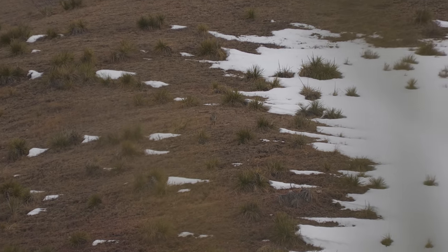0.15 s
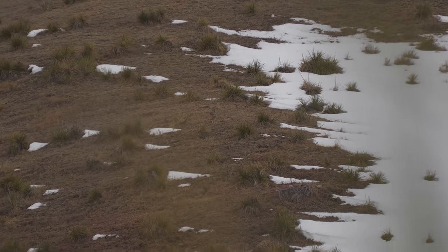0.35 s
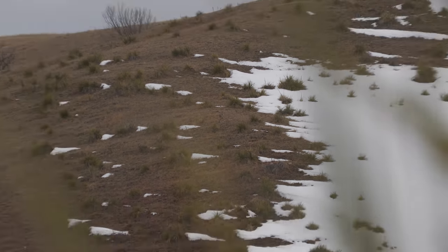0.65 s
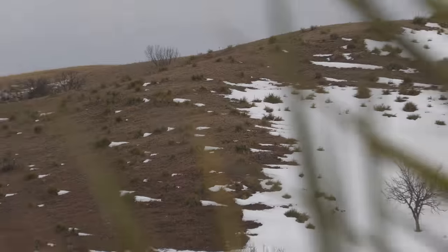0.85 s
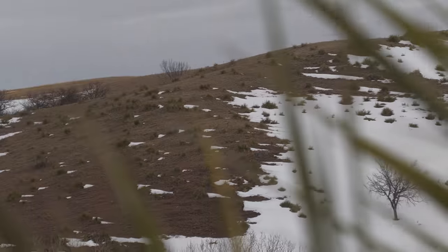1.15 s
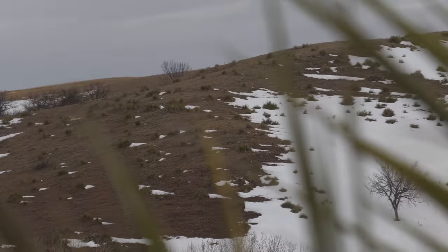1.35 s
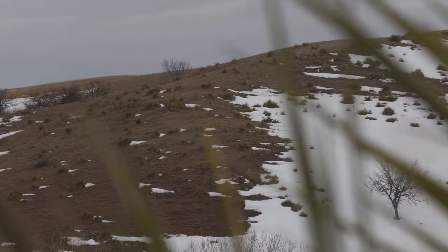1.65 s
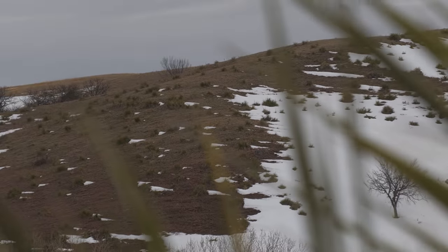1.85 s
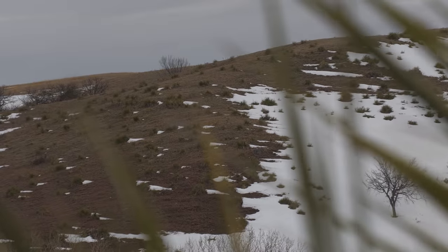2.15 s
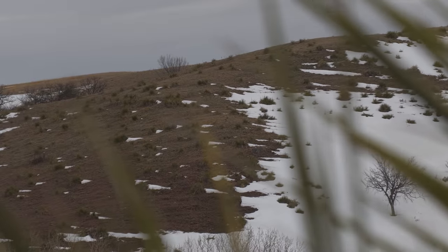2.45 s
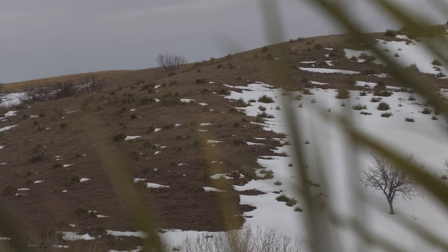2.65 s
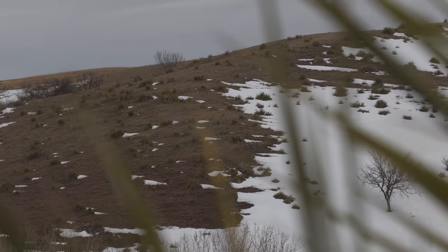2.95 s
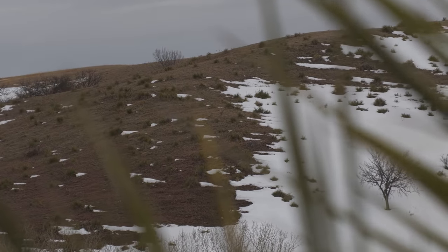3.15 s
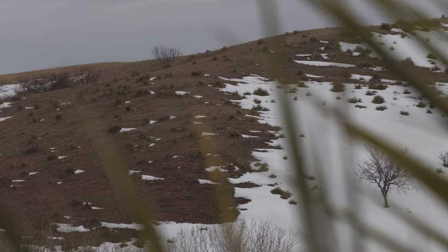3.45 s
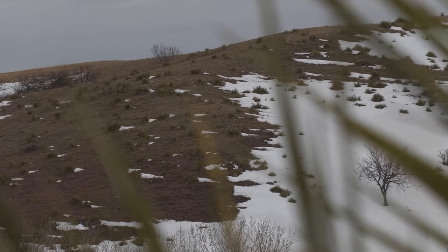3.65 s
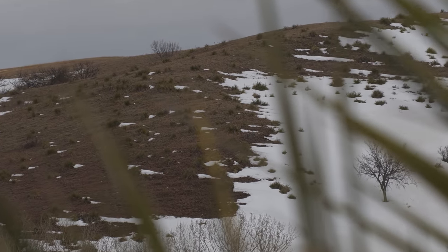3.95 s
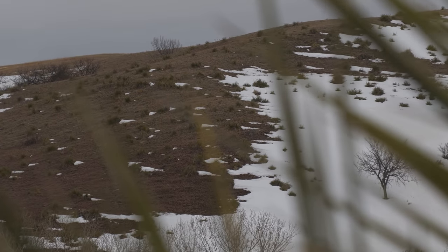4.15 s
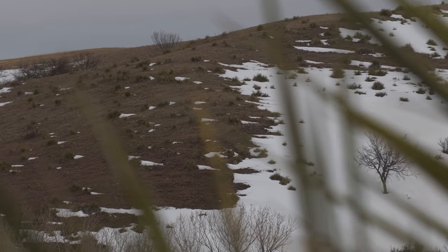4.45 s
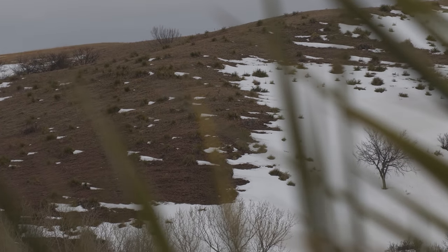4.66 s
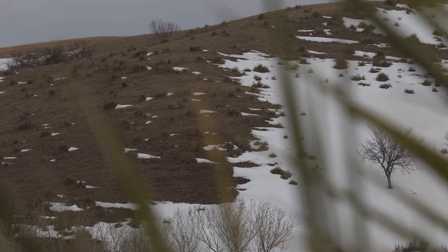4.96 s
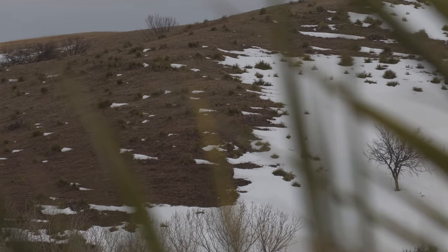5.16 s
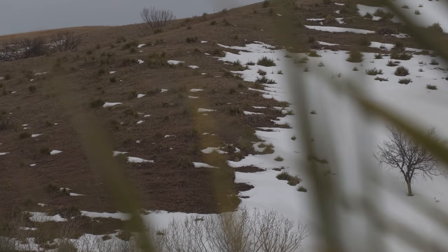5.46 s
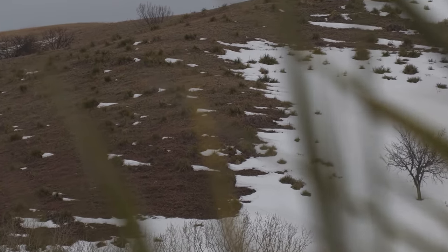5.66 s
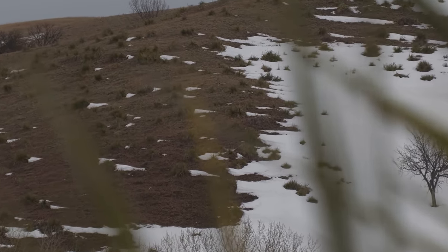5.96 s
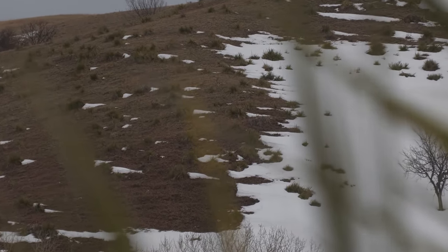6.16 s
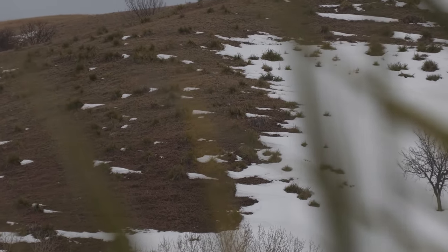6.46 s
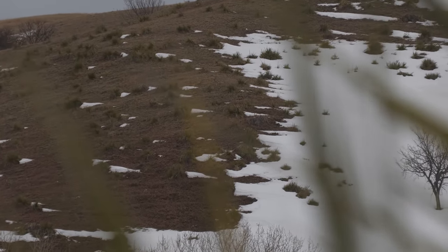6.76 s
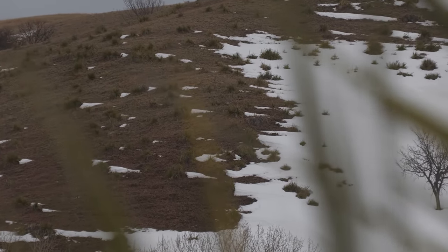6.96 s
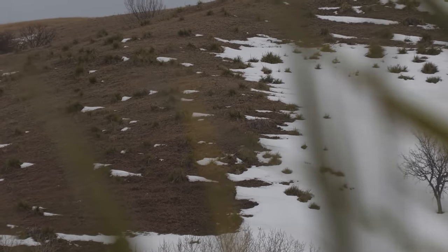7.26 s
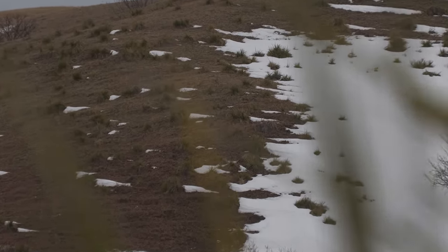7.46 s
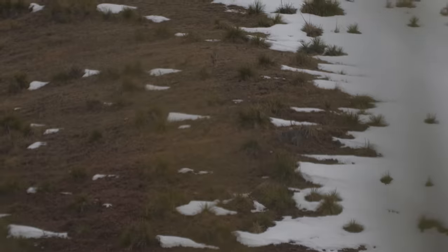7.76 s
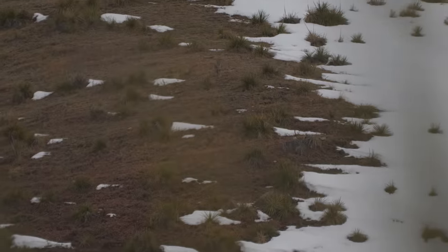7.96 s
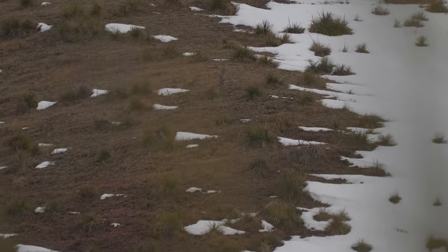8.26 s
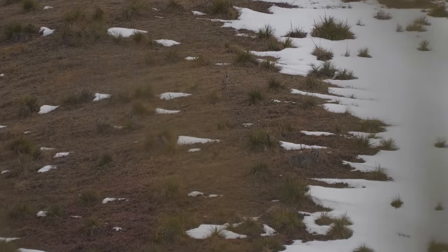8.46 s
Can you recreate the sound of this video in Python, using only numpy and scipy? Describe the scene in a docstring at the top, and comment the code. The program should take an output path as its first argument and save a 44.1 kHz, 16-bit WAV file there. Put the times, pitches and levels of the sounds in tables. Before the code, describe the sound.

A single coyote barks repeatedly on an open hillside. Each bark is very brief: a hoarse rasp jumping to a high squeal, then sliding down fast. The slopes return a diffuse echo fading over about a second. Low wind buffets the camera microphone throughout, with a few small handling ticks and soft hiss. After a pause, stronger gusts and a throaty huff precede the last bark.

```python
"""Coyote barking on an open hillside

Each bark starts as a hoarse rasp (uneven pulses and breath), locks into a high squeal (a gliding tone with
overtones) and slides down through the throat's resonances. A throaty huff comes before the last bark.
The slopes answer each bark with scattered copies for about a second. Wind, made of shaped noise and short
low swings, rumbles on the camera microphone. The camera ticks now and then, and its preamplifier hisses.
"""
import sys
import numpy as np
from scipy import signal
from scipy.fft import rfft, irfft, next_fast_len
from scipy.io import wavfile
from scipy.ndimage import uniform_filter1d, map_coordinates

SR = 44100
rng = np.random.default_rng(int(sys.argv[2]) if len(sys.argv) > 2 else 0)


def bounce(signal):
    """Save signal as a 16-bit WAV file at the path given by the first command-line argument."""
    frames = np.transpose(np.atleast_2d(signal))
    limited = np.clip(frames, -1, 1)
    pcm = np.round(limited * 32767).astype(np.int16)
    wavfile.write(sys.argv[1], SR, pcm)


N = 379701
LEAD = SR  # samples played before the start, so the first bark is only heard through its answer

# Noise tables give the colour only (level/dB per Hz, relative); the loudness is set where they are used.
# Wind strength over time, before short gusts: [t/s, buffet level/dB, roar level/dB]
WIND_STRENGTH = [(0, -28, -43), (.1, -31, -48), (.3, -37, -47), (.55, -32, -47), (1.25, -32, -47),
                 (1.4, -37, -50), (1.62, -34, -48), (2.1, -36, -48), (2.57, -42, -51), (2.85, -36, -49),
                 (3.25, -40, -50), (3.5, -32, -48), (3.85, -35, -48), (4.3, -40, -49), (4.8, -36.5, -48),
                 (5.42, -44, -49), (5.7, -39, -47), (5.9, -44, -48), (6.1, -37, -49), (6.2, -44, -51),
                 (6.5, -36, -50), (7.2, -38, -47), (7.35, -31, -45), (7.75, -28, -39), (7.85, -32, -44),
                 (8.02, -27, -37), (8.3, -31, -44), (8.61, -32, -45)]
# Colour of the low buffeting: [f/Hz, level/dB per Hz]
BUFFET_COLOUR = [(5, -23), (20, -6), (60, 2), (110, -1), (160, -8), (250, -23.5), (400, -68.5), (700, -120)]
# Colour of the roar above it: [f/Hz, level/dB per Hz]
ROAR_COLOUR = [(100, -16.5), (200, -1), (320, -8.5), (450, -13.5), (900, -27.5), (1300, -43.5),
               (2000, -46.5), (3500, -63), (5000, -120)]
# Colour of the hiss shared by both channels: [f/Hz, level/dB per Hz]
SHARED_HISS_COLOUR = [(300, 7.5), (1200, 7.5), (2200, 4.5), (3000, 2.5), (5380, 0), (5840, -0.5)]
# Colour of the hiss that is opposite in the two channels: [f/Hz, level/dB per Hz]
SIDE_HISS_COLOUR = [(1500, -37), (3000, -9), (5000, -3.5), (15000, -1.5)]
# Clear copies from near banks, before the answer's colour: [delay t/s, level/dB]
BANK_ECHOES = [(0.022, -23.5), (.18, -33.5)]
# How the scattered answer swells and dies: [delay t/s, relative level/dB]
SLOPE_ANSWER = [(.01, 16.5), (.05, -1), (.2, -4.5), (.38, -10.5), (.45, -17), (.9, -29), (1.3, -34)]
# Colour of everything the hillside returns: [f/Hz, gain level/dB]
ANSWER_COLOUR = [(300, -24), (700, -1.5), (1000, -3), (1350, 4.5), (1650, 7.5), (2000, 7.5), (2700, 6),
                 (4000, -4)]
# Knocks on the camera body: [t/s, level/dB before the soft onset, ring f/Hz, click level/dB before a shared trim]
CAMERA_TICKS = [(0.524, -39, 597, -39), (1.057, -33, 557, -15), (7.489, -49, 417, 0),
                (7.556, -38, 405, -22), (8.348, -36.5, 638, -12.5)]
# Colour of a tick's click: [f/Hz, level/dB per Hz]
CLICK_COLOUR = [(700, -10), (1500, -3), (3000, -4), (4000, -30)]
# Single strong eddies on the microphone: [centre t/s, highest swing level/dB, swing f/Hz]
EDDY_THUMPS = [(.537, -19, 91), (.795, -29, 108), (1.064, -19, 83), (1.172, -20, 68.6), (3.492, -31, 69.3),
               (7.271, -18.5, 84), (7.5, -21, 60.4), (7.67, -13, 75.4), (7.738, -19, 80),
               (8.004, -19, 70.6), (8.097, -27, 70), (8.206, -22, 70)]
# One row per bark, the first ending just before the start:
# [rasp starts t/s, squeal locks t/s, voice breaks t/s, lands t/s, slide ends t/s, top pitch f/Hz,
#  rasp level/dB, rasp held back at first level/dB,
#  squeal level/dB on entry, on locking, at the top, on landing, at the slide's end,
#  octave in the slide level/dB, low second tone level/dB,
#  extra towards the slopes level/dB: held squeal, slide]
BARK_LIST = [ (-.29, -.224, -.178, -.17, -.146, 2050, -24, 0, -28, -30, -20, -20, -31, -28, -44, .5, .5),
             (.56, .626, .672, .68, .704, 2040, -24, 0, -28, -28, -23, -20, -31, -30, -43, 3, 2),
             (1.29, 1.371, 1.405, 1.413, 1.443, 2055, -26, 0, -38, -24, -25.5, -19.5, -30, -35, -33, 4, 1),
             (1.748, 1.821, 1.845, 1.851, 1.874, 1924, -27, -2, -22, -24, -23, -22, -29.5, -31, -38, 3, 2),
             (2.972, 3.044, 3.078, 3.086, 3.112, 1990, -23, 2, -35, -24, -21, -19.5, -31, -30, -37, 1, 1),
             (3.752, 3.831, 3.858, 3.868, 3.889, 2010, -22, 4, -45, -25, -30, -17, -37, -31, -37, 4, -1),
             (4.452, 4.526, 4.545, 4.556, 4.582, 2010, -24, 6, -30, -32, -39, -19, -38, -35, -33, 11, -3),
             (4.922, 5.001, 5.028, 5.037, 5.06, 1952, -27, 3, -26, -20, -15, -15, -35, -21, -36, -6, -4),
             (5.756, 5.836, 5.868, 5.878, 5.904, 1965, -25, 0, -23, -24, -23, -15, -30.5, -26, -40, 0, -3),
             (7.945, 8.01, 8.043, 8.049, 8.072, 1925, -24, -2, -24, -20, -17, -13.5, -28, -27, -47, -5, 2),
             ]
# The rasp on its way to the lock:
# [share of that time, strongest partial f/Hz, level/dB against its peak, share of the holding back, roughness 0-1]
RASP_PATH = [(0, 940, -21, .3, .9), (.25, 1020, -10, 1, .9), (.5, 1100, -2, .8, .8), (.75, 1180, 0, 0, .75),
             (1, 1240, -7, 0, .45)]
# The rasp at the break: [strongest partial f/Hz, level/dB against its peak, roughness 0-1]
RASP_AT_BREAK = (1260, -21, .2)
# Partials of the rasp: [multiple of the pulse rate, relative level/dB]
PULSE_PARTIALS = [(1, -11), (2, 0), (3, -7), (4, -11), (5, -19), (6, -27)]
# Colour of the breath in the rasp: [f/Hz, level/dB per Hz]
BREATH_COLOUR = [(300, -34), (600, -11.5), (1000, 1.5), (1500, -4), (1800, -30), (2300, -51.5)]
# Colour of the upper breath of a hard push: [f/Hz, level/dB per Hz]
SNARL_COLOUR = [(1200, -37.5), (1700, 9.5), (2050, 4), (2350, -11), (2700, -17), (3200, -32), (4500, -58)]
# How the mouth shapes the rasp: [f/Hz, gain level/dB]
MOUTH_SHAPE = [(250, -8), (500, -1.5), (800, -5.5), (1150, 0), (1600, -0.5), (2050, -8.5), (2350, -13),
               (2700, -10.5), (3300, -14), (4500, -43)]
# Low second tone in the held squeal: [change of level/dB at entry, at the lock, at the top, at the break]
LOW_TONE_PATH = (-4, 0, -3, -16)
# Peaks and valleys of the throat: [f/Hz, gain level/dB]
THROAT_SHAPE = [(500, -6), (770, 0), (1000, -10), (1340, 0), (1640, -13), (1950, 0), (2300, -20), (2680, 0),
                (3150, -18), (3900, -12), (5000, -40)]
# Soft throaty huff before the last bark: [t/s, level/dB]
HUFF_PATH = [(7.67, -47), (7.685, -46), (7.705, -42), (7.74, -45), (7.762, -50)]
# Colour of the huff's breath: [f/Hz, level/dB per Hz]
HUFF_COLOUR = [(600, -43), (850, -3), (1050, 5.5), (1300, -7), (1600, -7), (1900, -47)]

GUST_DB, GUST_RATE = 2.5, 9  # short gusts: depth in dB, random points a second
# Squeal timing: enters this many s before the lock; share of the hold; s to rest after landing; s to die
ENTRY_S, TOP_AT, PAUSE_S, FADE_S = .018, .58, .014, .01
ENTRY_PITCH, LOCK_PITCH, BREAK_PITCH = .83, .98, .965  # shares of the top pitch
LAND_HZ, REST_HZ, END_HZ, LAST_HZ = 1450, 1285, 790, 740  # pitches after the break
BREAK_DB, REST_DB, FADE_DB = -1, -3, -11  # against the top, the landing, the slide's end
VALLEY_DIP_DB = -5  # the level dips halfway through the break, in the throat's deep valley near 1640 Hz
# Octave: against the held squeal; then on landing and when dying, against the octave in the slide
HELD_OCTAVE_DB, LANDING_OCTAVE_DB, OCTAVE_FADE_DB = -30, -17, -3
LOW_GONE_DB = -62  # low tone after the break
LOW_BASE_HZ, LOW_FOLLOWS = 400, .153  # the low tone adds this share of the squeal's pitch to its base
TOP_HZ, OFFSET = 15720, .01524  # the camera's band limit in Hz; its constant offset (full scale is 1)


def amp(db):
    """Turn decibels into a plain factor."""
    return 10 ** (np.asarray(db) / 20)


def unit(x):
    """Scale a sound to an rms of 1."""
    return x / np.sqrt(np.mean(x ** 2) + 1e-20)


def along(points, hz):
    """Read a value between (Hz, value) points, spaced as the ear hears pitch (log axis)."""
    f, v = np.transpose(points)
    return np.interp(np.log(hz + 1), np.log(f + 1), v)


def wobble(n, rate):
    """A smooth random curve through `rate` random points a second."""
    points = rng.standard_normal(int(n * rate / SR) + 4)
    return map_coordinates(points, [np.arange(n) * rate / SR])


def filtered(x, response):
    """Multiply each frequency of a sound by a response."""
    n = x.shape[-1]
    m = next_fast_len(n + 8192)
    hz = np.fft.rfftfreq(m, 1 / SR)
    return irfft(rfft(x, m) * response(hz), m)[..., :n]


def noise(n, colour):
    """Random noise with a given colour and an rms of 1."""
    return unit(filtered(rng.standard_normal(n), lambda hz: amp(along(colour, hz))))


def stretch(rows, fade):
    """Draw smooth curves through timed rows, with a fade in s added at each end: start, fade gain, curves."""
    s, *columns = np.transpose(rows)
    t = np.arange(s[0] - fade, s[-1] + fade, 1 / SR)
    edge = np.clip(np.minimum(t - t[0], t[-1] - t) / fade, 0, 1) ** 2
    curves = [uniform_filter1d(np.interp(t, s, c), size=110) for c in columns]
    return t[0], edge, curves


def turn(hz):
    """Phase of a tone whose pitch moves, from a random starting point."""
    return 2 * np.pi * (np.cumsum(hz) / SR + rng.random())


def wind():
    """Lumpy eddies buffet the microphone; stronger gusts add a roar above them."""
    s, buffet_db, roar_db = np.transpose(WIND_STRENGTH)
    t = np.arange(N) / SR
    lumps = wobble(N, 24)
    gusts = GUST_DB * wobble(N, GUST_RATE)
    buffet = unit(amp(1.15 * lumps) * noise(N, BUFFET_COLOUR))
    roar = unit(amp(0.83 * lumps + 1.28 * wobble(N, 60)) * noise(N, ROAR_COLOUR))
    buffet_gain = amp(np.interp(t, s, buffet_db) + gusts)
    roar_gain = amp(np.interp(t, s, roar_db) + .3 * gusts)
    return buffet_gain * buffet + roar_gain * roar


def hiss():
    """Preamplifier noise and far air, partly shared by the two channels."""
    mid = amp(-59.0) * noise(N, SHARED_HISS_COLOUR)
    side = amp(-66.5) * noise(N, SIDE_HISS_COLOUR)
    return np.array([mid + side, mid - side])


def hillside(voice):
    """Two banks return clear copies; the slopes scatter the voice along paths that flutter in the gusty air."""
    t = np.arange(round(1.3 * SR)) / SR
    delay, db = np.transpose(SLOPE_ANSWER)
    returned = np.zeros(len(voice))
    for _ in range(5):
        level_db = np.interp(t, delay, db, left=-80) + 0.67 * wobble(len(t), 26.46)
        scatter = rng.standard_normal(len(t)) * amp(level_db)
        path = signal.fftconvolve(voice, scatter / np.linalg.norm(scatter))[:len(voice)]
        flutter = 0.78 + 0.3 * wobble(len(voice), 70)
        returned += amp(-20.5) * path * flutter
    for s, echo_db in BANK_ECHOES:
        late = round(s * SR)
        returned[late:] += amp(echo_db) * voice[:-late]
    return filtered(returned, lambda hz: amp(along(ANSWER_COLOUR, hz)))


def ticks():
    """Small knocks on the camera body: two dying tones ring under a short click of noise."""
    out = np.zeros(N + SR)
    t = np.arange(SR // 10) / SR
    for s, db, hz, click_db in CAMERA_TICKS:
        tones = np.sin(2 * np.pi * hz * t) + 0.23 * np.sin(2 * np.pi * 1.59 * hz * t)
        ring = amp(-60 * t / .05) * tones  # falls 60 dB in 50 ms
        click = amp(click_db + 0.5 - 60 * t / 0.024) * noise(len(t), CLICK_COLOUR)
        onset = 1 - np.exp(-t / .001)
        out[round(s * SR):][:len(t)] += amp(db) * (ring + click) * onset
    return out[:N]


def thumps():
    """Each eddy pushes the microphone's diaphragm through about one and a half swings."""
    out = np.zeros(N + SR)
    t = np.arange(-SR // 20, SR // 20) / SR
    for (s, db, hz), chance in zip(EDDY_THUMPS, rng.random(len(EDDY_THUMPS))):
        swing = np.cos(2 * np.pi * (hz * t + chance))
        push = swing * np.exp(-(t * hz / 0.48) ** 2)
        out[round(s * SR):][:len(t)] += amp(db) * push
    return out[SR // 20:][:N]  # puts each centre at its listed time


def coyote():
    """The voice towards the camera and towards the slopes; the turning head favours different parts."""
    voice = np.zeros(LEAD + N)
    calls = [huff(HUFF_PATH)]
    facing = [(-1, 0)]  # (s, dB) towards the slopes
    for start, lock, brk, land, end, top_hz, rasp_db, held_db, *levels, hold_facing, slide_facing in BARK_LIST:
        calls.append(rasp(rasp_rows(start, lock, brk, rasp_db, held_db)))
        calls.append(squeal(squeal_rows(lock, brk, land, end, top_hz, *levels)))
        facing += [(lock - ENTRY_S, 0), (lock, hold_facing), (brk, hold_facing)]
        facing += [(land, slide_facing), (end + FADE_S, slide_facing)]
    for start, sound in calls:
        voice[LEAD + round(start * SR):][:len(sound)] += sound
    t = (np.arange(LEAD + N) - LEAD) / SR
    return voice, voice * amp(np.interp(t, *np.transpose(facing)))


def rasp_rows(start, lock, brk, db, held_db):
    """Path of one hoarse start: (s, Hz, dB, roughness)."""
    rows = [(start + u * (lock - start), hz, db + change - share * held_db, rough)
            for u, hz, change, share, rough in RASP_PATH]
    end_hz, end_db, end_rough = RASP_AT_BREAK
    return rows + [(brk, end_hz, db + end_db, end_rough)]


def rasp(rows):
    """Vocal folds beat at half the strongest partial, unevenly in time and size, with breath leaking through."""
    start, edge, (hz, db, rough) = stretch(rows, fade=.006)
    n = len(hz)
    phase = turn(hz / 2) + .7 * rough * wobble(n, 220)
    effort = amp(0.25 * (db + 21))  # a harder push is brighter
    tone = 0
    for k, partial_db in PULSE_PARTIALS:
        share = 1 if k == 2 else rough * effort  # a clean voice keeps only its strongest partial
        uneven = 1 + 0.49 * rough * wobble(n, 189)
        tone = tone + share * amp(partial_db) * np.sin(k * phase) * uneven
    leak = amp(-.5) * noise(n, BREATH_COLOUR) + amp(-5) * effort * noise(n, SNARL_COLOUR)
    breath = rough * leak * (1 + .5 * np.cos(phase))  # the breath pulses with the folds
    throb = amp(1.9 * rough * wobble(n, 95.4) - 2.0 * rough)
    source = edge * amp(db) * throb * (np.sqrt(2) * tone + breath)
    return start, filtered(source, lambda f: amp(along(MOUTH_SHAPE, f)))


def squeal_rows(lock, brk, land, end, top_hz, entry_db, lock_db, top_db, land_db, end_db, octave_db, low_db):
    """The squeal climbs, holds, breaks downward, rests and slides out: (s, Hz, dB, octave dB, low tone dB)."""
    s = [lock - ENTRY_S, lock, lock + TOP_AT * (brk - lock), brk,
         (brk + land) / 2, land, land + PAUSE_S, end, end + FADE_S]
    break_hz = BREAK_PITCH * top_hz
    hz = [ENTRY_PITCH * top_hz, LOCK_PITCH * top_hz, top_hz, break_hz,
          (break_hz + LAND_HZ) / 2, LAND_HZ, REST_HZ, END_HZ, LAST_HZ]
    break_db = top_db + BREAK_DB
    db = [entry_db, lock_db, top_db, break_db,
          (break_db + land_db) / 2 + VALLEY_DIP_DB, land_db, land_db + REST_DB, end_db, end_db + FADE_DB]
    octave = [d + HELD_OCTAVE_DB for d in db[:5]]
    octave += [octave_db + LANDING_OCTAVE_DB, octave_db] + [octave_db + OCTAVE_FADE_DB] * 2
    low = [low_db + d for d in LOW_TONE_PATH] + [LOW_GONE_DB] * 5
    return np.transpose([s, hz, db, octave, low])


def squeal(rows):
    """A high oscillation with overtones and some breath; a low one sounds beside it and mixes with it."""
    start, edge, (hz, db, octave_db, low_db) = stretch(rows, fade=.008)
    n = len(hz)
    high = turn(hz) + 0.3 * wobble(n, 152.4)
    low = turn(LOW_BASE_HZ + LOW_FOLLOWS * hz) + .2 * wobble(n, 60)
    tone = amp(db + along(THROAT_SHAPE, hz)) * np.sin(high)
    tone += amp(db - 22) * noise(n, SNARL_COLOUR)
    tone += amp(octave_db + along(THROAT_SHAPE, 2 * hz)) * np.sin(2 * high)
    tone += amp(octave_db - 25 + along(THROAT_SHAPE, 3 * hz)) * np.sin(3 * high)
    # the low tone, plus tones at sums and differences of the two pitches
    mixed = np.sin(low) + amp(-16) * np.sin(high + low)
    mixed += amp(-26) * np.sin(2 * high - low + .8 * wobble(n, 200))
    tone_gain = amp(1.8 * wobble(n, 86))
    low_gain = amp(low_db + 2.9 * wobble(n, 80))
    return start, np.sqrt(2) * edge * (tone_gain * tone + low_gain * mixed)


def huff(rows):
    """Breath chopped by slack folds that flap about fifty times a second."""
    start, edge, (db,) = stretch(rows, fade=.004)
    n = len(db)
    phase = turn(np.full(n, 53)) + .8 * wobble(n, 40)
    flap = 1.2 + (1 + np.cos(phase)) ** 2
    return start, edge * amp(db) * unit(flap * noise(n, HUFF_COLOUR))


def scene():
    """Add the voice, its answer, the wind and the camera's own noises."""
    near, towards_slopes = coyote()
    animal = (near + hillside(towards_slopes))[LEAD:]
    return animal + wind() + thumps() + ticks() + hiss()


def record(dry):
    """The camera adds a small constant offset and keeps nothing above its band limit."""
    return filtered(dry, lambda hz: hz < TOP_HZ) + OFFSET


dry = scene()
out = record(dry)
bounce(out)
```